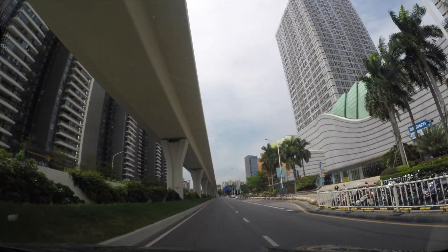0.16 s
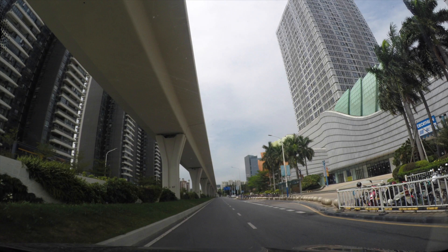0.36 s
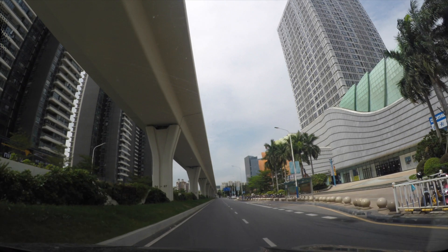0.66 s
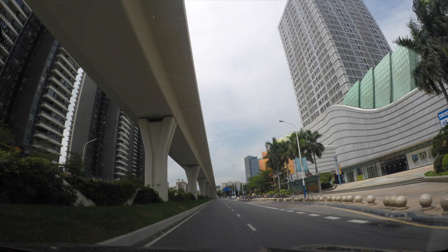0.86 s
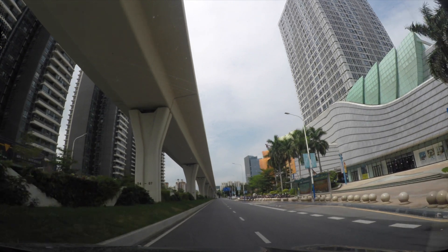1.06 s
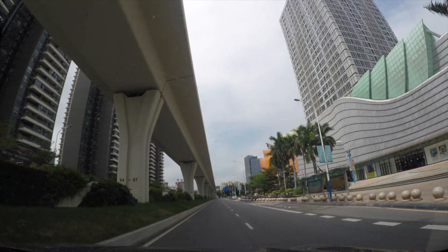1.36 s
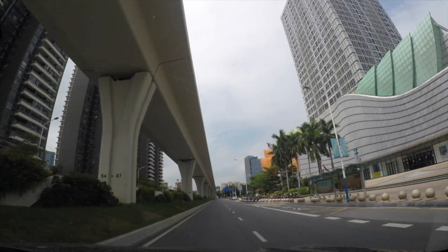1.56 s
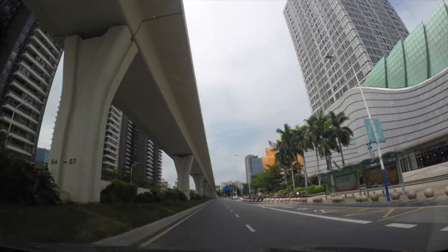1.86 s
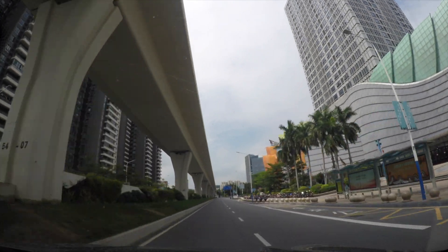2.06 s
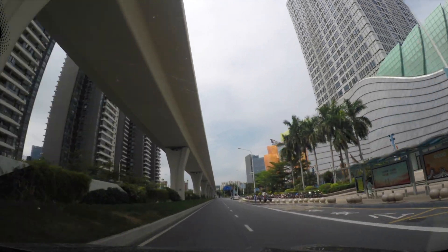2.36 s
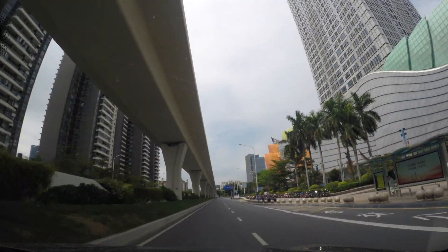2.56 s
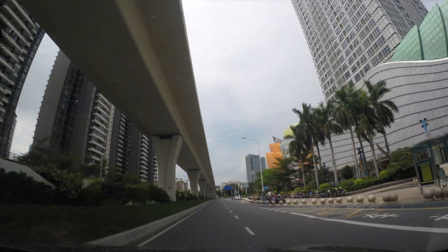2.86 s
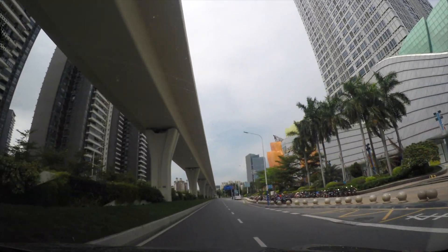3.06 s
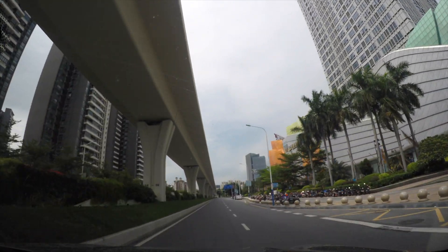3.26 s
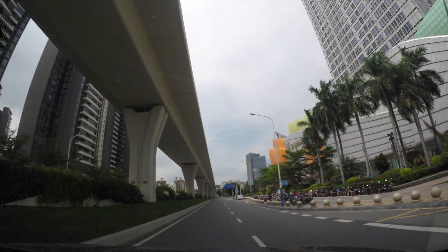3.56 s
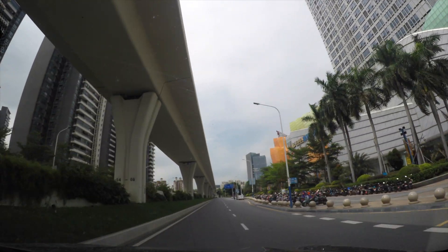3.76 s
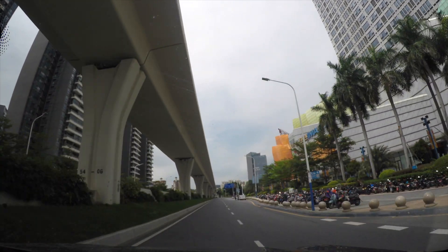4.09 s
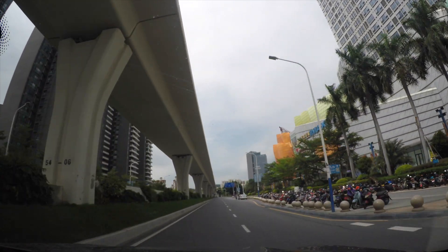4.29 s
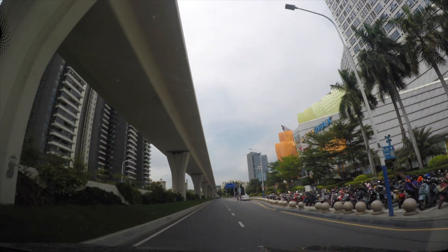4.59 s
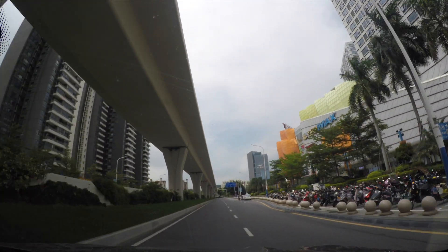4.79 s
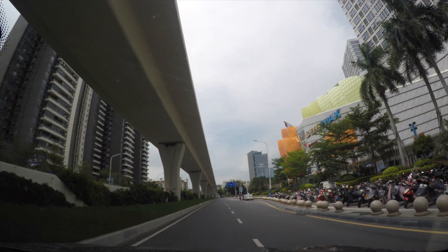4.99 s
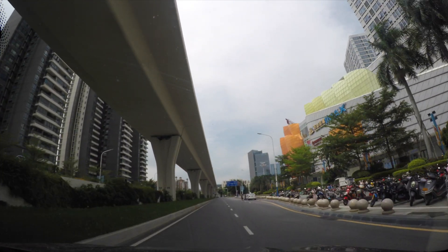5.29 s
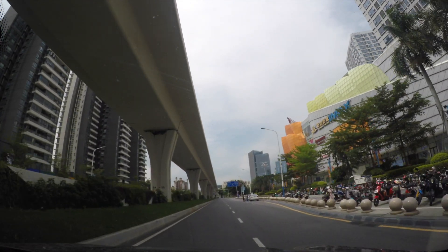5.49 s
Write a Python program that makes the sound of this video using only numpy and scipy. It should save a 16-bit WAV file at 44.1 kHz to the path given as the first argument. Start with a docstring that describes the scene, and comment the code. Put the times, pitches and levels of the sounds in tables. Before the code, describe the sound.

A steady low rumble of engine and tyres inside a car on a city road, the engine booming gently with each acceleration.

```python
"""Microphone behind the windscreen of a car rolling along a city road, windows shut.
From the start the road shakes the body, the tyres roar through the panels and air hisses.
At 0.3 s a push on the pedal sets the engine booming in the cabin; the trim ticks faintly until 2.1 s.
The revs drop at an upshift, and the boom returns with pushes at 2.4, 4.2 and 5.5 s."""
import sys
import numpy as np
from scipy import signal
from scipy.fft import irfft
from scipy.io import wavfile

SR = 44100
rng = np.random.default_rng(int(sys.argv[2]) if len(sys.argv) > 2 else 0)


def wav_record(signal):
    """Record a signal, one row per channel, as 16-bit PCM in the file named by sys.argv[1]."""
    frames = np.transpose(np.atleast_2d(signal))
    bounded = np.clip(frames, -1, 1)
    # unit amplitude maps onto the largest positive 16-bit level
    quanta = np.round(bounded * 32767).astype(np.int16)
    wavfile.write(sys.argv[1], SR, quanta)


N = 248397
TIME = np.arange(N) / SR
FREQS = np.fft.rfftfreq(N, 1 / SR)

# engine speed, dropping at the upshift: time_s, firing_hz
ENGINE_SPEED = [(0, 57), (.4, 60.17), (.8, 60.72), (1.45, 62.93), (2.2, 59.35), (2.6, 53.31), (2.9, 49.77),
                (3.25, 48.34), (4.2, 48.51), (4.58, 51.7), (4.9, 48.64), (5.6, 49.26)]
# firing tone off the pedal, stronger at low revs: firing_hz, level_db
COASTING = [(48, -30.5), (55, -33.5)]
# pushes on the pedal: start_s, release_s, peak_db, rise_s
PEDAL_PUSHES = [(0.288, 1.53, -19, 0.35), (2.435, 3.513, -16.5, 0.42), (4.19, 4.982, -15.5, 0.32),
                (5.456, 5.635, -14, 0.35)]
# engine overtones against the firing tone: firing_multiple, relative_db
OVERTONES = [(2, -24), (3, -36.5), (4, -40), (6, -37.5), (7, -38.5), (9, -40)]
# cabin air modes that lift an overtone as it passes: centre_hz, width_hz, lift_db
AIR_MODES = [(125.3, 16, 11.5), (190, 13, 10.5), (398, 15, 3.5), (413, 30, 4), (583, 20, 2)]
# panel and cabin resonances: centre_hz, width_hz, lift_db
CABIN_MODES = [(226.6, 21, 7), (280, 17, 1.5), (334, 34, 0.5), (436, 16, 3.5), (572, 18, 2), (540.6, 20, 7),
               (760, 25, 2), (828, 38, 4), (922, 35, 3), (1419, 60, 5.5), (1537, 62, 4.5), (1600, 60, 4),
               (1780, 31, 3.5), (2160, 63, 2), (2283, 41, 5.5), (3500, 130, 1.5), (5350, 55, 3.5)]
# noise spectra before those resonances: frequency_hz, relative_db
RASP_SPECTRUM = [(200, -30), (400, 5), (560, -6), (900, -19), (1600, -28), (4000, -45)]
HISS_SPECTRUM = [(400, -1), (900, 6), (1300, 0), (1650, -3.5), (1900, -5), (2800, -9), (3700, -10.5),
                 (4100, -14), (5200, -15), (8000, -20), (12400, -24), (13300, -29), (14800, -27),
                 (15300, -48)]
THUD_SPECTRUM = [(10, -10.5), (20, 8.5), (27, 6), (44, 9.5), (58, -2.5), (78, 1), (104, -1.5), (116, -4.5),
                 (150, -20)]
DRONE_SPECTRUM = [(105, -19.5), (116, -3.5), (123, -4), (130, -4.5), (139, -6.5), (150, -20.5)]
ROAR_SPECTRUM = [(70, -33), (130, -7.5), (165, 4), (235, -1), (265, -2.5), (400, -5.5), (475, -6),
                 (502, -11), (560, -15), (600, -14), (850, -20.5), (1050, -32.5), (2000, -67)]
HOLLOW_SPECTRUM = [(240, -25), (330, -1.5), (400, 1.5), (460, -3), (580, -15.5), (800, -30.5)]
# bumps that rock the body: peak_s, level_db
ROAD_BUMPS = [(.11, -15), (0.27, -14.5), (.53, -15.5), (.71, -11.5), (.87, -18), (1.068, -20),
              (1.25, -16.5), (1.46, -14.5), (1.65, -22), (1.979, -14.5), (2.12, -23), (2.229, -23),
              (2.39, -21), (2.59, -16.5), (2.71, -18.5), (2.931, -15.5), (3.189, -19.5), (3.46, -18),
              (3.84, -20.5), (4.06, -21.5), (4.201, -20.5), (5.266, -19.5)]
# coarseness of the asphalt against a smooth road: time_s, added_db
COARSENESS = [(0, -0.7), (1.0, 3.5), (1.9, 0), (2.5, 1), (2.95, 0), (3.3, -0.3), (3.9, -1.1), (4.7, -0.5),
              (5.6, 1.1)]
# rough patches that drum through the suspension: centre_s, added_db
ROUGH_PATCHES = [(.38, 5.5), (.97, 2.5), (1.38, 3.5), (2.74, 2.5), (4.1, 4.5), (5.42, 1.5)]
# tyre roar and air hiss as heard inside: time_s, level_db
ROAR_LEVELS = [(0, -37), (.8, -36), (1.3, -36.5), (1.8, -36.5), (2.3, -36), (3, -37.5), (3.6, -37),
               (4.6, -37), (5.15, -37), (5.6, -37)]
HISS_LEVELS = [(0, -55.5), (.55, -55), (1.1, -54), (1.9, -54.5), (2.5, -55.5), (2.85, -54.5), (3.4, -55.5),
               (3.9, -55.5), (4.7, -55.5), (5.1, -55), (5.6, -55)]
# hollow swells in the middle range of the roar: centre_s, level_db, half_length_s
HOLLOW_SWELLS = [(.85, -43, 0.33), (2.282, -47.5, 0.11), (2.853, -48, 0.14)]
# air ringing inside the tyres, and a thin whine: pitch_hz, level_db, waver_hz
STEADY_TONES = [(200, -46, 1.3), (11127, -98, 1.5)]
# plastic trim snapping: start_s, level_db, centre_hz, width_hz, decay_s
TRIM_TICKS = [(.3402, -55.5, 3600, 4500, .004), (.347, -58.5, 4200, 4000, .002),
              (.360, -61, 4500, 5000, .0012), (.371, -56.5, 5500, 10000, .0045),
              (1.1575, -56, 6000, 15000, .0055), (1.159, -51, 2550, 1100, .0018),
              (2.1072, -57.5, 9000, 16000, .0025), (2.108, -54.5, 4600, 1200, .0035)]
# resonances of the plastic: centre_hz, width_hz, lift_db
PLASTIC_MODES = [(2600, 700, 8), (4520, 500, 5), (6150, 350, 5), (7500, 700, 4), (13300, 2200, 4)]
# tiny pings, each set off by a click: start_s, ring_db, pitch_hz, click_db
TRIM_PINGS = [(1.1935, -65.5, 14000, -71), (1.5395, -59.5, 14130, -61)]


def amp(db):
    """Decibels to gain."""
    return 10 ** (np.asarray(db) / 20)


def curves(rows):
    """Each column after the first as a curve over time."""
    times, *columns = np.transpose(rows)
    return [np.interp(TIME, times, column) for column in columns]


def noise(gain):
    """Noise of rms 1, its spectrum shaped by the given gains."""
    x = irfft(gain * np.exp(2j * np.pi * rng.random(len(FREQS))), N)
    return x / np.sqrt(np.mean(x ** 2) + 1e-20)


def wander(rate_hz):
    """Random drift of rms 1, up to about the given rate."""
    return noise(np.exp(-(FREQS / rate_hz) ** 2) * (FREQS > 0))


def band(centre_hz, width_hz):
    """Gain of one broad resonance at each frequency."""
    return 1 / (1 + (2 * (FREQS - centre_hz) / width_hz) ** 2)


def lift_db(modes, hz):
    """How much a set of resonances raises the given frequencies."""
    return sum(db / (1 + (2 * (hz - centre) / width) ** 2) for centre, width, db in modes)


def swell(centre_s, half_s):
    """Bell-shaped envelope peaking at 1."""
    return np.exp(-((TIME - centre_s) / half_s) ** 2 / 2)


def snap(start_s, decay_s, rise_s=.0008):
    """Envelope of a small impact: a quick rise and an exponential decay."""
    age = np.maximum(TIME - start_s, 0)
    return np.minimum(age / rise_s, 1) * np.exp(-age / decay_s)


def cabin_noise(spectrum):
    """Noise of rms 1 as it reaches the microphone, coloured by the cabin's resonances."""
    hz, db = np.transpose(spectrum)
    slope_db = np.interp(np.log(FREQS + 1), np.log(hz), db, left=-np.inf, right=-np.inf)
    return noise(amp(slope_db + lift_db(CABIN_MODES, FREQS)))


def pedal(firing_hz, fall_s=.1):
    """Strength of the firing tone: each push builds smoothly, holds, and dies back to coasting."""
    coast = amp(np.interp(firing_hz, *np.transpose(COASTING)))
    strength = coast.copy()
    for start_s, release_s, peak_db, rise_s in PEDAL_PUSHES:
        attack = np.sin(np.pi / 2 * np.clip((TIME - start_s) / rise_s, 0, 1)) ** 2
        fall = np.exp(-np.maximum(TIME - release_s, 0) / fall_s)
        strength += (amp(peak_db) - coast) * attack * fall
    return strength


def engine(rasp_relative_db=-33, intake_relative_db=-45):
    """From the cabin: a firing tone, wavering overtones, rasp and intake hiss, all swelling with load."""
    firing_hz, = curves(ENGINE_SPEED)
    phase = 2 * np.pi * np.cumsum(firing_hz) / SR
    tone = np.sin(phase)
    for multiple, db in OVERTONES:
        strength = amp(db + lift_db(AIR_MODES, multiple * firing_hz) + 2.0 * wander(rate_hz=1.3))
        tone += strength * np.sin(multiple * phase + 2 * np.pi * rng.random() + 0.34 * wander(rate_hz=32))
    speed_gain = (firing_hz / firing_hz.max()) ** 5  # mechanical noise grows steeply with revs
    firing_pulse = 1 + 0.84 * np.cos(phase)
    rasp = amp(rasp_relative_db) * speed_gain * firing_pulse * cabin_noise(RASP_SPECTRUM)
    intake = amp(intake_relative_db) * cabin_noise(HISS_SPECTRUM)
    return pedal(firing_hz) * (np.sqrt(2) * tone + rasp + intake)


def body_shake(mode_hz=37.77, width_hz=14, level_db=-26.5, bump_hz=36.7):
    """The road keeps the body's lowest mode swinging; bumps rock it harder, a little lower in pitch."""
    out = amp(level_db) * noise(1 / (1 + (2 * (FREQS - mode_hz) / width_hz) ** 4))
    for peak_s, db in ROAD_BUMPS:
        age = TIME - peak_s
        envelope = swell(peak_s, half_s=np.where(age < 0, 0.043, 0.044))
        out += amp(db) * envelope * np.sqrt(2) * np.sin(2 * np.pi * (bump_hz * age + rng.random()))
    return out


def road(thud_base_db=-26, drone_base_db=-38.5):
    """Rough asphalt thuds through the suspension and sets the cabin air droning; tyres roar, air hisses."""
    coarse_db, = curves(COARSENESS)
    patch_db = sum(db * swell(centre_s, half_s=0.12) for centre_s, db in ROUGH_PATCHES)
    thud_db = thud_base_db + coarse_db + 0.76 * patch_db + wander(rate_hz=7.7)
    thud = amp(thud_db) * cabin_noise(THUD_SPECTRUM)
    drone = amp(drone_base_db + 0.93 * coarse_db + patch_db) * cabin_noise(DRONE_SPECTRUM)
    roar = amp(curves(ROAR_LEVELS)[0] + 0.26 * wander(rate_hz=43)) * cabin_noise(ROAR_SPECTRUM)
    hollow_gain = sum(amp(db) * swell(centre_s, half_s) for centre_s, db, half_s in HOLLOW_SWELLS)
    hollow = hollow_gain * cabin_noise(HOLLOW_SPECTRUM)
    hiss = amp(curves(HISS_LEVELS)[0] + 0.64 * wander(rate_hz=52)) * cabin_noise(HISS_SPECTRUM)
    return thud + drone + roar + hollow + hiss


def tyre_hum_and_whine():
    """Air rings inside the tyres under a very faint, thin whine; both waver in pitch and level."""
    out = np.zeros(N)
    for pitch_hz, db, waver_hz in STEADY_TONES:
        phase = 2 * np.pi * np.cumsum(pitch_hz + waver_hz * wander(rate_hz=7.5)) / SR
        out += amp(db + 1.2 * wander(rate_hz=2.8)) * np.sqrt(2) * np.sin(phase)
    return out


def trim():
    """Close by in the cabin, plastic parts snap together and ring; twice a small hard part pings."""
    out = np.zeros(N)
    plastic = amp(lift_db(PLASTIC_MODES, FREQS))
    for start_s, db, centre_hz, width_hz, decay_s in TRIM_TICKS:
        out += amp(db) * snap(start_s, decay_s) * noise(plastic * band(centre_hz, width_hz))
    for start_s, ring_db, pitch_hz, click_db in TRIM_PINGS:
        ring = np.sqrt(2) * np.sin(2 * np.pi * pitch_hz * TIME)
        click = noise(band(centre_hz=13000, width_hz=2400))
        out += amp(ring_db) * snap(start_s, decay_s=.008) * ring
        out += amp(click_db) * snap(start_s, decay_s=.003) * click
    return out


def scene():
    """Everything as heard from one spot behind the windscreen, in mono."""
    return (engine() + body_shake() + road() + tyre_hum_and_whine() + trim())[None]


def record(dry):
    """The microphone chain passes nothing much above 15.3 kHz."""
    lowpass = signal.firwin(511, 15300, window=("kaiser", 9), fs=SR)
    return signal.oaconvolve(dry, lowpass[None], "same")


dry = scene()
out = record(dry)
wav_record(out)
```